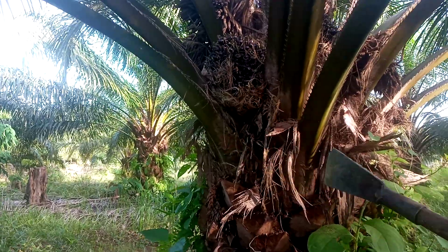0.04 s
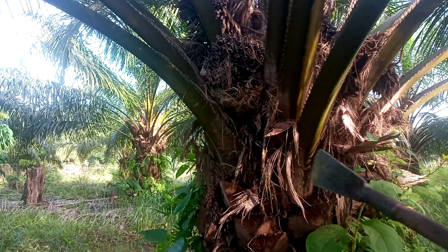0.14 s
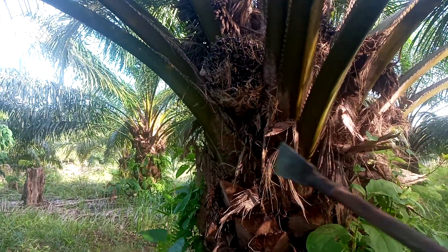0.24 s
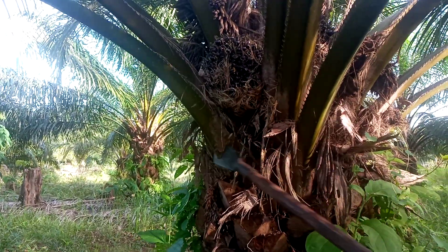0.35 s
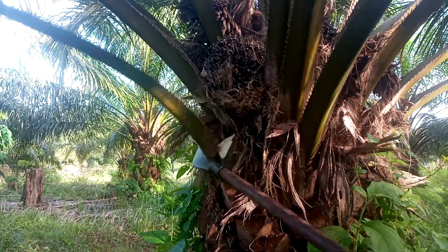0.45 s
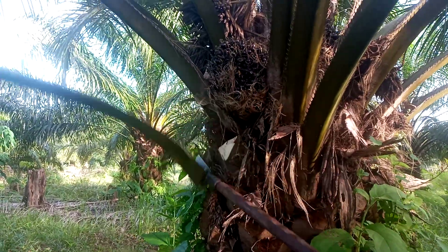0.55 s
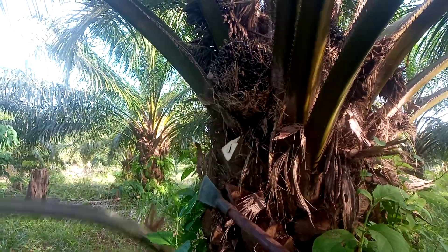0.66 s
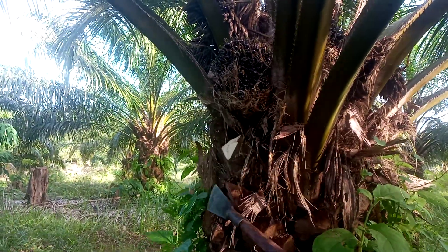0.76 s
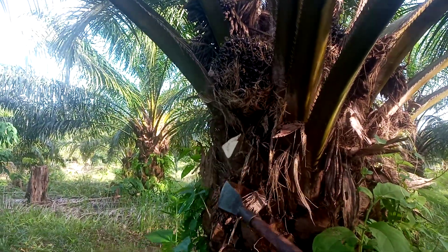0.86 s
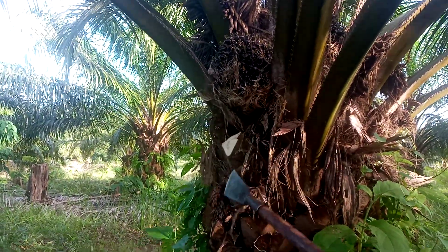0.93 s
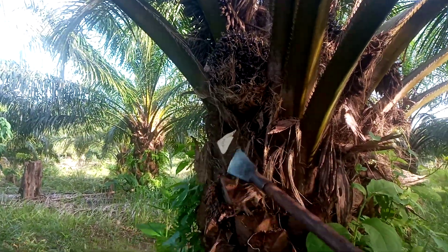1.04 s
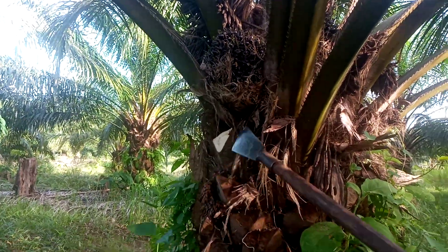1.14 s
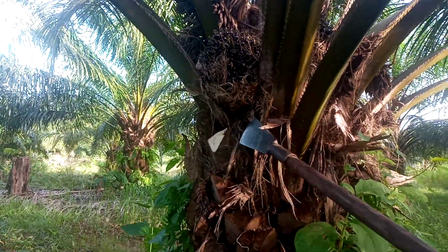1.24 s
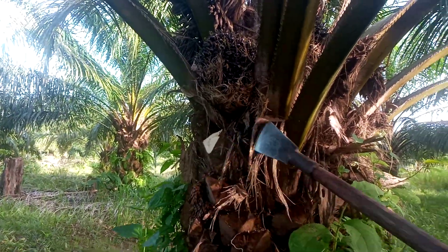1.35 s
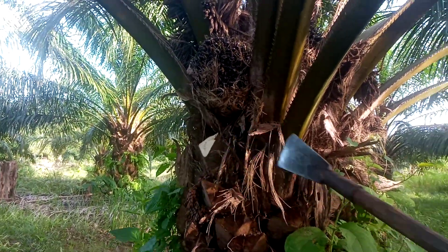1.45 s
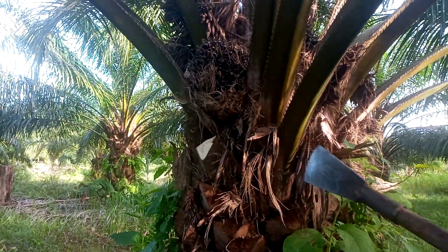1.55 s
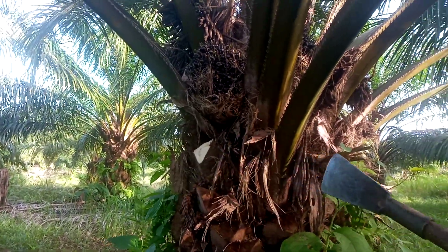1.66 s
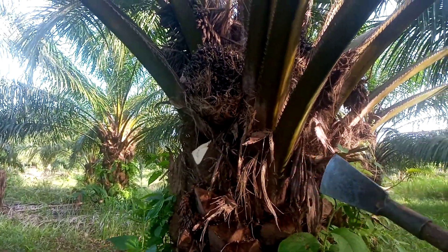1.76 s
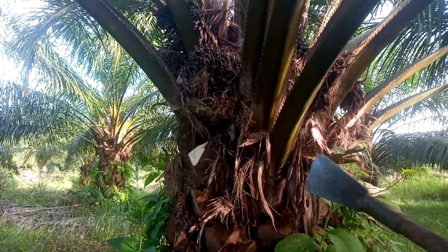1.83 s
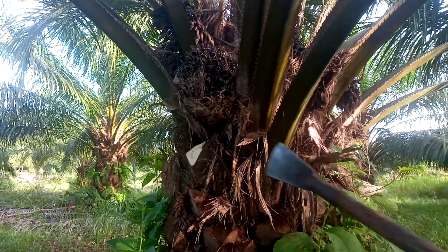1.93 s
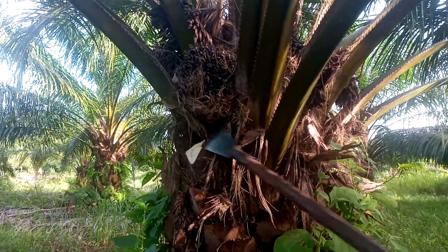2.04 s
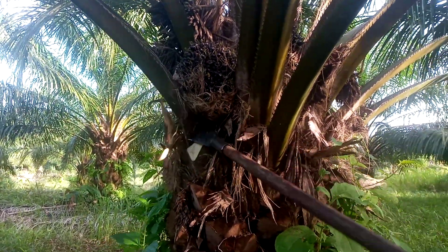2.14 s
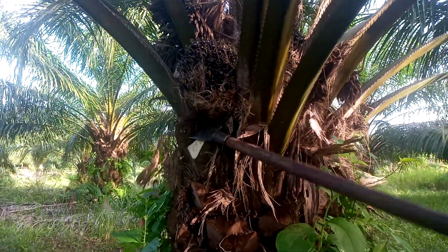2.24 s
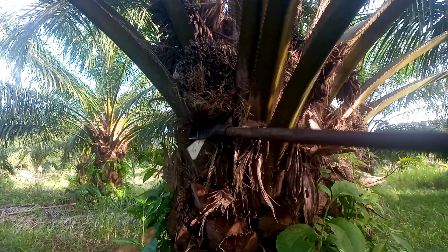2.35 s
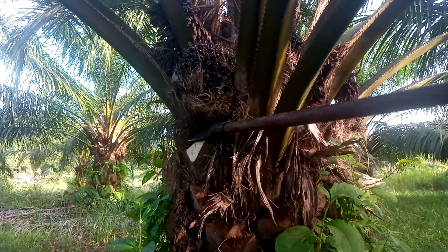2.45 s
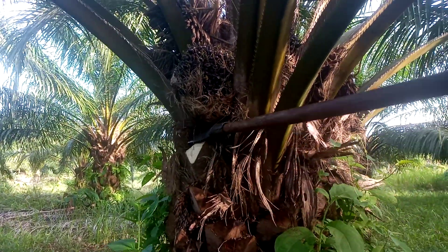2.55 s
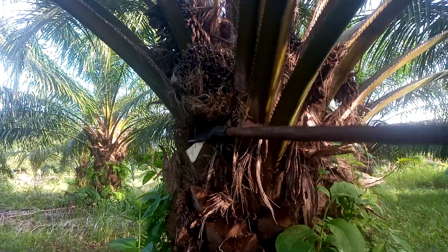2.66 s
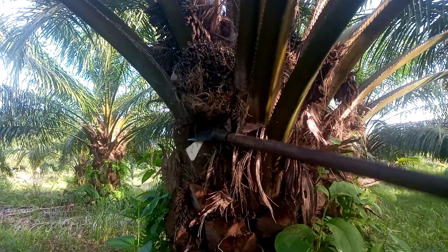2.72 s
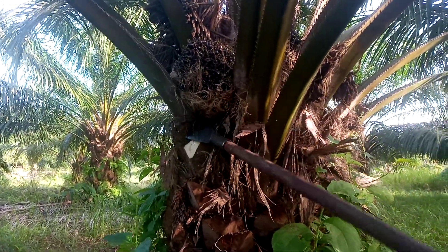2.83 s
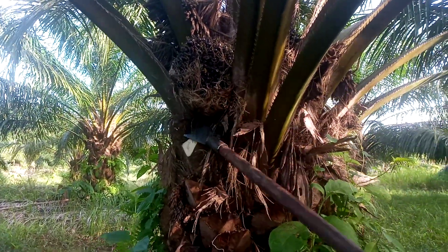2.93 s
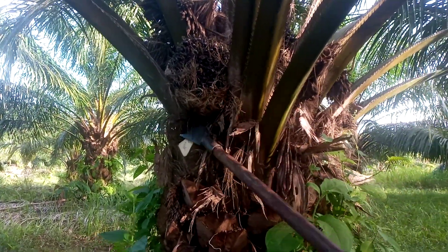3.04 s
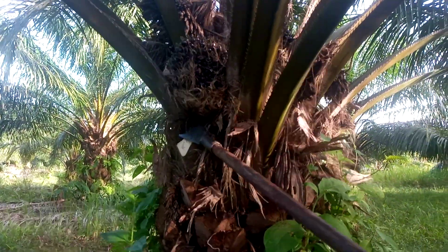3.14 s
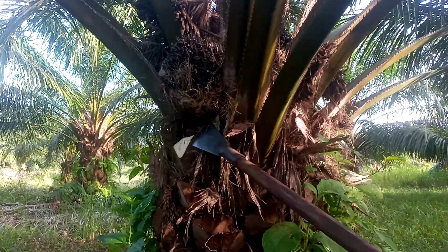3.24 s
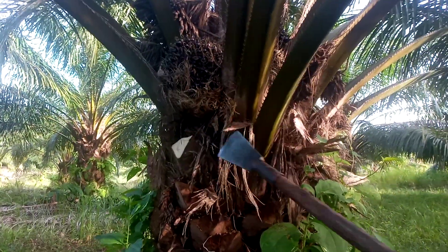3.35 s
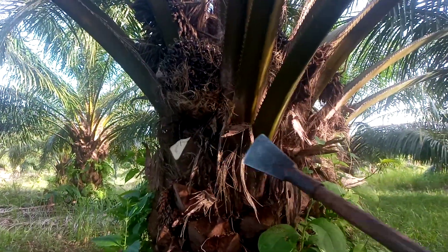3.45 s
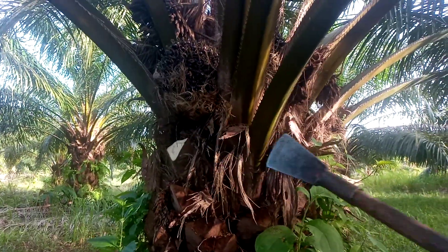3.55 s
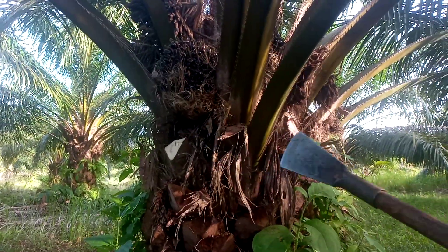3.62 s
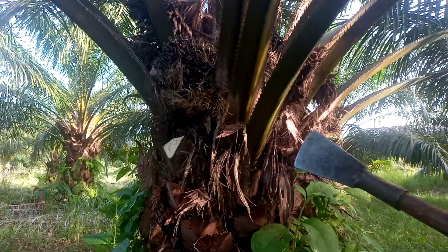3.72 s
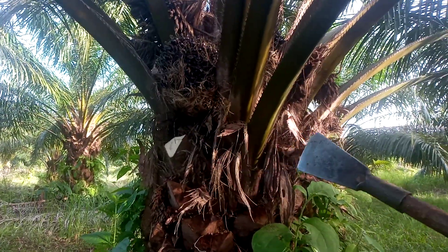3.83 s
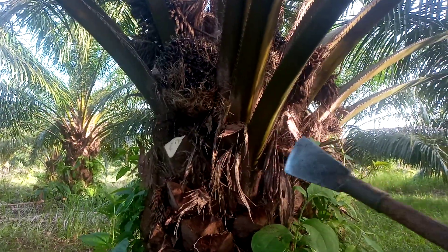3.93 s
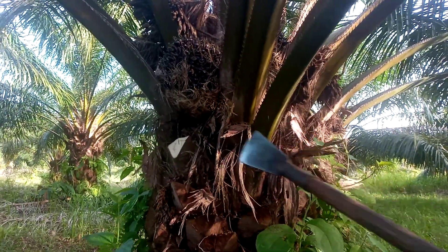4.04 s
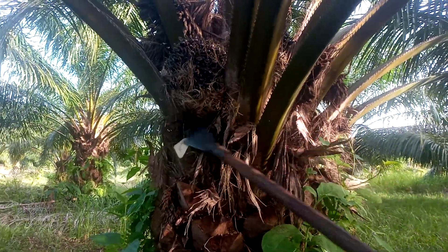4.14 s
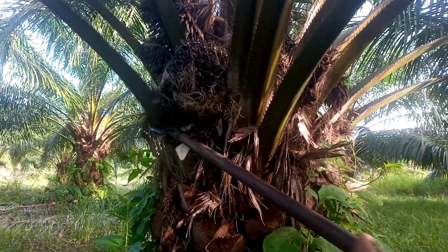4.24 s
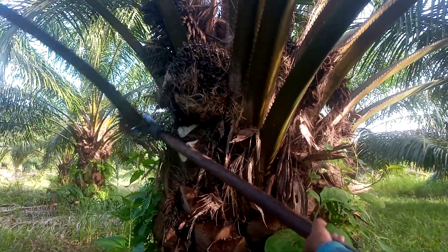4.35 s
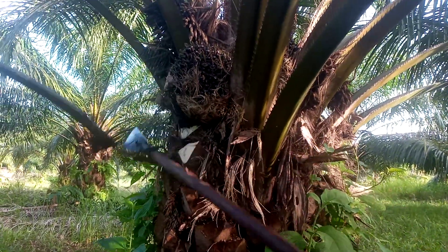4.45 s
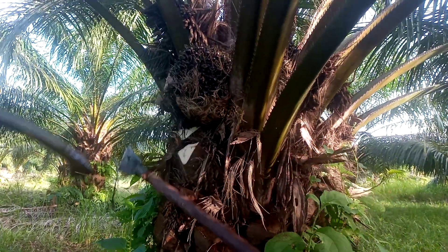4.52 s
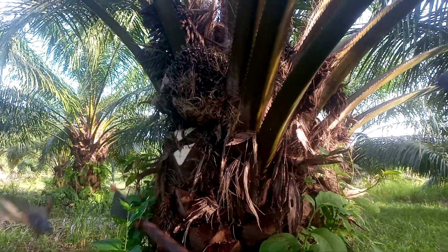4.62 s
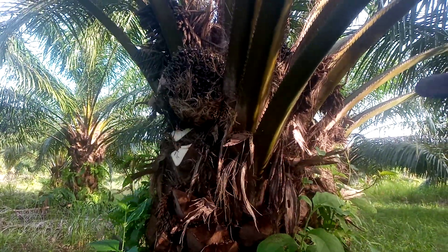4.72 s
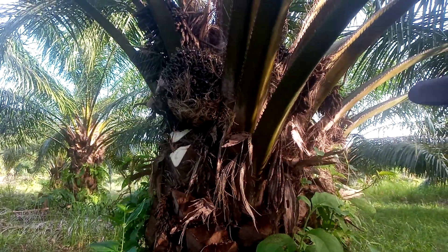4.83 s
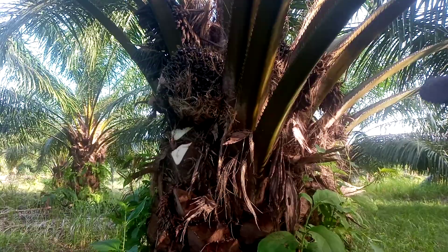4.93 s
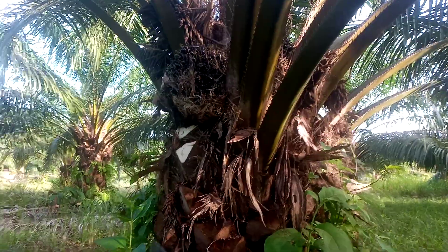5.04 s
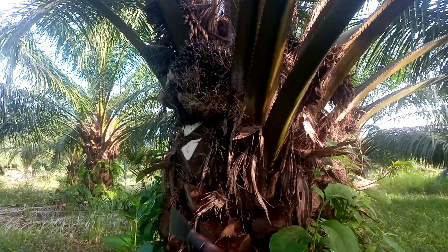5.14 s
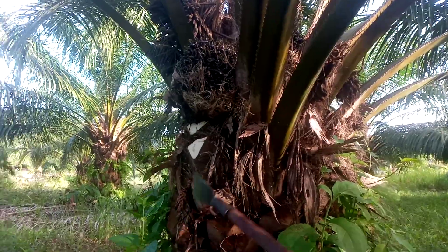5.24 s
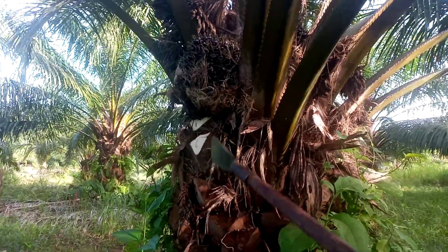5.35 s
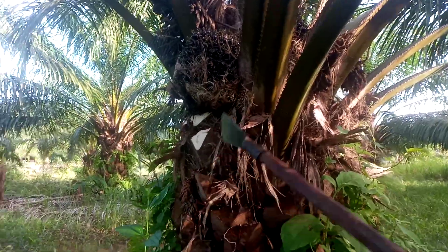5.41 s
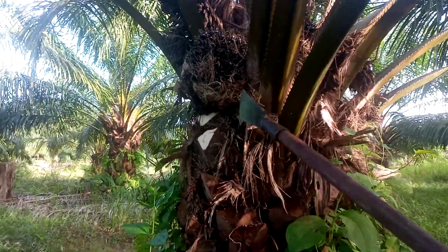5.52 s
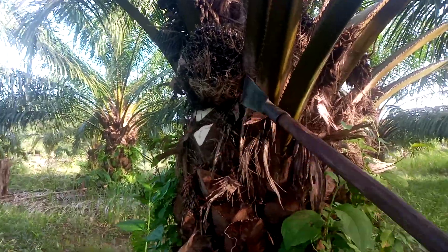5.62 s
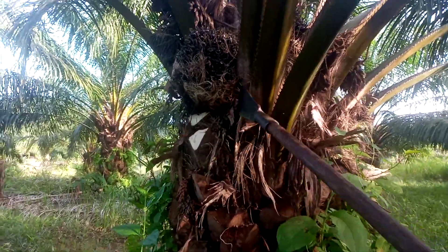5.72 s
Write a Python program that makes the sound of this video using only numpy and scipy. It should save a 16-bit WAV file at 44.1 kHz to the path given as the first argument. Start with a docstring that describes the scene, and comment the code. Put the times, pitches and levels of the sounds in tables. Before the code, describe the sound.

An open palm plantation with very quiet low air, a high insect chorus and a near cricket throbbing about fourteen times a second around 7.4 kHz, coming and going. At 0.33 s a steel blade ticks and crunches hard into a wet stalk; the frond slides down in a swelling dry rustle, thumps at 0.92 s, whips over with bright snaps and settles by 1.5 s. The pole brushes dry fibre softly. At 2.07 s a second chop cracks with a short metallic squeak and jams; from 2.2 to 2.5 s it creaks and jerks woodily. Faint rubs and crisp leaf snaps follow around 3 to 3.4 s. Knocks and a crunch at 4.2 s cut another frond, which rustles faster, lands with the heaviest thump at 4.86 s, bounces and settles. Light brushing and a leafy hiss end it near 5.7 s. Close phone sound, both channels identical, slight grove echo.

```python
"""Insects shrill all around, bands of noise with a throbbing cricket tone, and a pole brushes dry fibre.
A steel chisel on this long wooden pole chops fronds off an oil palm, a few metres from a phone.
Each stroke ticks and crunches, as bursts of tiny fractures shake the stalk and the blade.
Two cut fronds rustle down as surges of crackle and noise, and thump on the ground as sinking low tones.
The second stroke jams, and the blade creaks in runs of slips as it is levered free."""
import sys
import numpy as np
from scipy import signal
from scipy.fft import rfft, irfft
from scipy.io import wavfile
from scipy.ndimage import uniform_filter1d

SR = 44100
rng = np.random.default_rng(int(sys.argv[2]) if len(sys.argv) > 2 else 0)


def dump(signal):
    """Clip the signal to [-1, 1] and save it as 16-bit WAV at the path in sys.argv[1]."""
    limited = np.clip(np.atleast_2d(signal).T, -1, 1)
    pcm = np.round(limited * 32767).astype(np.int16)
    wavfile.write(sys.argv[1], SR, pcm)


N = 254898
T = np.arange(N) / SR  # time in seconds

# Tone colour of breaking fibres. Each row: frequency in Hz, relative level in dB.
CRUNCH_COLOUR = [(240, -50.5), (400, -3), (570, -12), (1460, -2.5), (2050, -8), (2400, -1), (3420, -1.5),
                 (3810, -5.5), (4510, -2.5), (5110, -8.5), (6850, -1), (13300, -20.5), (15000, -11.5),
                 (16000, -5.5)]
# Tones of the steel blade. Each row: frequency in Hz, relative level in dB, time to fall by 60 dB in seconds.
BLADE_TONES = [(1288, -21, 0.27), (1470, -5.5, 0.035), (1934, 0, 0.068), (2974, -12.5, 0.089),
               (3740, 2, 0.21), (4240, -18, 0.51), (5530, -17, 0.17), (6920, -29, .15)]


def amp(db):
    """Turn dB into a plain multiplier."""
    return 10 ** (np.asarray(db) / 20)


def unit(x):
    """Scale x to an average (RMS) level of 1."""
    return x / np.sqrt(np.mean(x ** 2))


def noise():
    """Steady random hiss as long as the scene."""
    return rng.standard_normal(N)


def decay(t, t60):
    """Fading gain that falls by 60 dB in t60 seconds."""
    return np.exp(-np.log(1000) * t / t60)


def add(out, s, x):
    """Mix x into out at time s."""
    i = int(s * SR)
    out[i:i + len(x)] += x[:N - i]


def band(x, hz, width):
    """Keep only a band of frequencies around hz."""
    low = np.hypot(hz, width / 2) - width / 2
    high = min(low + width, .45 * SR)
    return signal.sosfilt(signal.butter(2, [low, high], "band", fs=SR, output="sos"), x)


def treble(x, hz):
    """The part of x above hz, in phase with x."""
    return signal.sosfiltfilt(signal.butter(2, hz, "high", fs=SR, output="sos"), x)


def colour(x, points, size=2048):
    """Filter of unit energy with the given (Hz, dB) shape; it never sounds ahead of its input."""
    hz, db = np.transpose(points)
    bins_hz = np.arange(size // 2 + 1) * SR / size
    gain = amp(np.interp(np.log(bins_hz + 1), np.log(hz), db))
    # folding the cepstrum gives the filter its earliest possible response
    cepstrum = irfft(np.log(gain))
    cepstrum[1:size // 2] *= 2
    cepstrum[size // 2 + 1:] = 0
    h = irfft(np.exp(rfft(cepstrum)))
    return signal.fftconvolve(x, h / np.linalg.norm(h))[:len(x)]


def ring(x, modes):
    """Let x strike a set of damped tones; their dB are shares of a unit energy."""
    t = T[:SR // 2]
    h = np.zeros(len(t))
    for k, (hz, db, t60) in enumerate(modes):
        tone = np.sin(2 * np.pi * hz * t) * decay(t, t60)
        h += (-1) ** k * amp(db) / np.sqrt(t60) * tone
    return signal.fftconvolve(x, h / np.linalg.norm(h))[:N]


def walk(rate):
    """Smooth random wandering with a spread of 1, given a new target rate times a second."""
    k = int(SR / rate)
    steps = np.repeat(noise()[:N // k + 1], k)
    return unit(uniform_filter1d(steps, k)[:N])


def crackle(rate, spread_db):
    """Tiny fractures at random times, about rate a second, a few much larger than the rest."""
    sizes = amp(spread_db * np.minimum(rng.exponential(size=N), 5))
    return unit((rng.random(N) < rate / SR) * sizes * np.sign(noise()))


def burst(t60):
    """Noise that starts at once and dies away."""
    t = T[:SR // 5]
    return np.sign(rng.standard_normal(len(t))) * decay(t, t60)


def surge(s, rise, hold, fade):
    """Gain of one movement: it accelerates, holds and dies away."""
    return np.clip((T - s) / rise, 0, 1) ** 2 * np.exp(-np.maximum(T - s - rise - hold, 0) / fade)


def air():
    """Quiet, low background noise whose level wanders slowly."""
    # Each row: frequency in Hz, relative level in dB.
    air_colour = [(18, -88), (30, -13), (107, -7), (164, -9), (228, -19.5), (247, -30), (388, -25.5),
                  (560, -32), (1500, -58), (4000, -60), (5200, -68), (8800, -120)]
    return colour(noise(), air_colour) * amp(-69 + 1.9 * walk(6.8))


def insects():
    """A far chorus in fixed bands of noise and one near cricket, an unsteady tone that throbs evenly."""
    # Each row: centre in Hz, width of each filter pass in Hz, level in dB.
    chorus_bands = [(5010, 1650, -56.5), (6710, 890, -50), (7456, 710, -47), (15400, 1500, -63)]
    # Stretches where the cricket tone is loud enough to hear.
    # Each row: start in seconds, length in seconds, level in dB.
    audible_spans = [(-.05, 1.3, -39.5), (1.396, 1.06, -41.5), (2.756, 0.88, -43), (3.725, 0.53, -38),
                     (4.85, 1.14, -41.5)]
    span_edge_s, throbs_per_s, throb_depth = 0.15, 13.57, 1
    chorus = np.zeros(N)
    for hz, width, db in chorus_bands:
        hum = unit(band(band(noise(), hz, width), hz, width))
        chorus += hum * amp(db + 0.33 * walk(3.34) + 1.6 * walk(40))
    throb = (.5 + .5 * np.cos(2 * np.pi * throbs_per_s * (T - .235))) ** 1.2
    pitch_hz = 7438 + 18 * walk(90) + 50 * walk(900)
    wing = np.sqrt(2) * np.sin(2 * np.pi * np.cumsum(pitch_hz) / SR) * amp(2.5 * walk(270))
    audible_gain = np.zeros(N)
    for s, length, db in audible_spans:
        to_edge = np.minimum(T - s, s + length - T)
        audible_gain += amp(db) * np.clip(to_edge / span_edge_s + .5, 0, 1)
    return chorus + wing * (1 - throb_depth * (1 - throb)) * audible_gain


def brushing():
    """Dry fibre crackles softly against the moving pole and chafes in brief patches of changing pitch."""
    # Moves of the pole. Each row: start, rise, hold and fade in seconds, relative level in dB.
    moves = [(0.073, 0.13, 0.047, 0.051, -58.5), (1.484, 0.07, 0.19, 0.12, -57.5),
             (1.864, .13, 0.025, 0.053, -47.5), (2.07, 0.044, 0.38, 0.22, -44),
             (2.824, 0.24, 0.075, 0.18, -53), (3.9, 0.31, .01, .03, -46.5), (5.3, 0.19, .3, 0.055, -54.5)]
    # Tone colour of dry fibre. Each row: frequency in Hz, relative level in dB.
    fibre_colour = [(180, -31), (300, -11), (511, -24.5), (645, -15.5), (946, -28), (1780, -10),
                    (4990, -6.5), (7320, -7), (8940, -9), (16000, -20)]
    holding_db = -66  # faint chafing while the pole is held back
    chafe_db, chafe_flutter_db = -10, 3
    surges = [amp(db) * surge(*shape) for *shape, db in moves]
    gain = amp(holding_db) + np.linalg.norm(surges, axis=0)
    grains = crackle(6000, 2.4)
    chafe = np.zeros(N)
    for hz in np.geomspace(1100, 2800, 4):
        chafe += band(crackle(1500, 2.5), hz, .35 * hz) * amp(chafe_flutter_db * walk(30))
    crackling = colour(grains * gain * amp(4.6 * walk(35)), fibre_colour)
    return amp(2.5) * crackling + amp(chafe_db) * gain * unit(chafe)


def rubs():
    """Pole and loose stalks rub briefly on old frond stubs: faint grainy noise, each rub with its own pitch."""
    # Each row: start in seconds, length in seconds, centre in Hz, level in dB.
    rub_times = [(.209, 0.034, 1010, -56.5), (0.273, 0.052, 1650, -57), (0.901, .026, 293, -46.5),
                 (2.028, 0.035, 1790, -50), (3.021, 0.041, 2530, -49.5), (3.186, 0.033, 2640, -48),
                 (3.193, 0.042, 1480, -47.5), (3.392, 0.017, 3020, -46), (3.509, .018, 2030, -54.5),
                 (3.946, 0.024, 2720, -57.5), (4.119, .026, 1480, -48.5), (4.145, .03, 1900, -48),
                 (4.297, 0.062, 261, -48.5)]
    out, grains = np.zeros(N), crackle(1500, 1.2)
    for s, length, hz, db in rub_times:
        n = int(length * SR)
        chafe = band(grains[int(s * SR):][:n], hz, 0.45 * hz)
        add(out, s, amp(db) * unit(chafe) * signal.windows.tukey(n))
    return out


def cracks(rows, ring_db):
    """Sharp cracks with a short splintering tail; they set the blade ringing."""
    bodies, splinters, steel = np.zeros((3, N))
    for s, db, hz, t60 in rows:
        crack = amp(db) * (burst(t60) + 0.13 * burst(0.092))
        width = min(0.67 * hz, 3800)
        add(bodies, s, band(crack, hz, width) * np.sqrt(SR / width))
        add(splinters, s, crack)
        steel[int(s * SR)] = amp(db + ring_db)
    splintering = 0.41 * colour(treble(splinters, 560), CRUNCH_COLOUR) + 0.4 * treble(splinters, 15000)
    return 0.58 * bodies + splintering + amp(34.0) * ring(steel, BLADE_TONES)


def snaps():
    """The loudest dry fibres snap, each a bright, short crack."""
    # Each row: start in seconds, relative level in dB, centre in Hz, main part's time to fall by 60 dB in seconds.
    snap_times = [(.332, -33, 11500, 0.026), (.971, -25.5, 6330, 0.015), (1.062, -17.5, 4400, 0.0068),
                  (1.069, -14, 4600, 0.0051), (1.078, -15, 5330, .003), (1.127, -18, 6150, 0.0074),
                  (1.207, -19, 6150, 0.0099), (1.370, -23, 6130, 0.0077), (1.612, -26, 6040, 0.015),
                  (2.071, -21, 5500, 0.006), (3.236, -18, 7500, 0.0089), (3.253, -20, 7060, .012),
                  (3.282, -21, 7260, 0.018), (3.330, -19, 7400, 0.017), (3.343, -17.5, 6840, 0.0088),
                  (4.958, -20.5, 6350, 0.016), (5.197, -19, 10200, 0.0092)]
    return cracks(snap_times, ring_db=-33)


def knocks():
    """The blade or a falling stalk knocks against wood, mostly a lower crack than a snap."""
    # Each row: start in seconds, relative level in dB, centre in Hz, main part's time to fall by 60 dB in seconds.
    knock_times = [(.333, -25.5, 3130, 0.018), (.412, -24.5, 2400, 0.042), (.923, -22, 1240, 0.007),
                   (1.548, -29.5, 1300, 0.0081), (2.0705, -18, 2160, .005), (2.076, -36, 2030, 0.015),
                   (2.755, -20.5, 3750, .022), (2.767, -28.5, 3700, 0.018), (3.128, -37, 2580, 0.02),
                   (3.331, -38, 1150, 0.014), (4.015, -40.5, 580, 0.023), (4.077, -33, 2230, 0.02),
                   (4.183, -22, 2020, 0.015), (4.226, -22.5, 1320, 0.034)]
    return cracks(knock_times, ring_db=-31)


def squeaks():
    """Short gliding, unsteady tones: the steel blade sings, and one faint low creak."""
    # Each row: start in seconds, length in seconds, mean pitch at start and at end in Hz, mean level in dB.
    squeak_times = [(.333, .028, 3600, 3570, -44), (2.088, .019, 4150, 4650, -24),
                    (2.812, .085, 960, 1100, -57), (4.200, .014, 4050, 4300, -34),
                    (4.425, .025, 1940, 1960, -42)]
    out = np.zeros(N)
    waver, unsteady_gain = 1 + 0.034 * walk(920), amp(2.6 * walk(200))
    for s, length, start_hz, end_hz, db in squeak_times:
        i, n = int(s * SR), int(length * SR)
        hz = np.linspace(start_hz, end_hz, n) * waver[i:i + n]
        add(out, s, amp(db) * signal.windows.tukey(n) * np.sin(2 * np.pi * np.cumsum(hz) / SR))
    return out * unsteady_gain


def rustle():
    """Stiff leaflets sweep past each other, flick and scrape, and now and then one snaps."""
    # In order: the first frond slides down, lands, whips over and settles; the blade draws back through dry leaf;
    # the second frond slides down, gathers speed, lands, bounces, lies down and settles;
    # the blade goes back in among dry leaf.
    # Each row: start, rise, hold and fade in seconds, relative level in dB, extra treble in dB.
    sweeps = [(0.355, 0.16, 0.1, 0.42, -34.5, -3), (0.869, 0.12, 0.042, 0.072, -32, -5),
              (1.075, 0.052, 0.0071, 0.011, -37, 5), (1.138, 0.03, 0.17, 0.14, -37, -4),
              (3.215, .04, 0.12, 0.049, -58.5, 14), (4.228, 0.058, 0.36, 0.24, -36, -6),
              (4.689, .11, 0.044, 0.035, -36, 1), (4.828, 0.053, 0.011, 0.044, -28.5, -6.5),
              (4.924, 0.048, 0.011, 0.09, -31, -3), (4.994, 0.058, 0.1, 0.019, -33, -5.5),
              (5.182, .07, 0.036, 0.17, -38, -6), (5.704, 0.067, .05, .05, -50.5, 11.5)]
    # Tone colour of leaves. Each row: frequency in Hz, relative level in dB.
    leaf_colour = [(59, -26.5), (100, -18), (174, -14.5), (249, -17.5), (308, -14.5), (818, -19),
                   (1650, -9.5), (2580, -8.5), (3620, -4), (5190, -8.5), (7290, -1), (9210, -12),
                   (12900, -21), (15000, -9.5), (16000, -22)]
    snaps_per_s, snap_db, snap_hz, snap_spread_db = 96, -15, 5800, 4.5
    # overlapping surges add in power
    body = np.linalg.norm([amp(db) * surge(*shape) for *shape, db, _ in sweeps], axis=0)
    top = np.linalg.norm([amp(db + treble_db) * surge(*shape) for *shape, db, treble_db in sweeps], axis=0)
    flicks = crackle(7000, 2.2) + .8 * noise()
    # leaflets of different sizes take turns, so each band flutters on its own
    flutter = np.zeros(N)
    for hz in np.geomspace(1200, 10000, 6):
        flutter += band(crackle(1500, 2.2), hz, hz / 2) * amp(4 * walk(80))
    leaves = colour(unit(flicks + 0.26 * flutter) * amp(1.4 * walk(70)), leaf_colour)
    hiss = treble(leaves, 5800)
    snapping = signal.fftconvolve(crackle(snaps_per_s, snap_spread_db), burst(0.0046))[:N]
    snapping = unit(band(snapping, snap_hz, 3900))
    return amp(3.5) * body * (leaves - hiss) + amp(9.0) * top * hiss + amp(snap_db) * body * snapping


def chops():
    """Fibres break in a dense volley as the edge goes through; they shake the stalk and the blade."""
    # Volleys of breaking fibre, the first two from one stroke.
    # Each row: start, rise, hold and fade in seconds, stalk pitch in Hz,
    # then relative levels in dB of the crunch, the stalk's thud and the blade's ring.
    volleys = [(0.371, 0.0069, 0.0023, 0.0079, 361, -14, -24.5, -32),
               (0.393, 0.0051, 0.012, 0.025, 325, -27, -43, -31.5),
               (2.087, 0.0015, 0.025, .009, 244, -19.5, -34.5, -40.5),
               (4.196, 0.027, 0.018, 0.011, 215, -19.5, -28.5, -71)]
    # Thick wet stalk. Each row: multiple of its pitch, relative level in dB, time to fall by 60 dB in seconds.
    stalk_tones = [(.55, -6, 0.031), (1, 1, 0.029), (1.6, -11.5, 0.032)]
    crunch, steel, thud = np.zeros((3, N))
    fibres = crackle(9000, 6.2) * amp(0.32 * walk(350))
    for s, rise, hold, fade, hz, crunch_db, thud_db, ring_db in volleys:
        push = np.clip((T - s) / rise, 0, 1) * np.exp(-np.maximum(T - s - rise - hold, 0) / fade)
        force = fibres * push
        crunch += amp(crunch_db) * force
        steel += amp(ring_db) * force
        thud += amp(thud_db) * ring(force, [(hz * k, db, t60) for k, db, t60 in stalk_tones])
    return colour(crunch, CRUNCH_COLOUR) + thud + ring(steel, BLADE_TONES)


def thumps():
    """Low thumps, from heavy blows to faint dull rumbles: a damped swing sinks in pitch, with a dull crush."""
    # Each row: start in seconds, relative level in dB, base pitch in Hz (the swing sinks from 1.133 to
    # 0.633 times this), time to fall by 60 dB in seconds.
    thump_times = [(0.921, -22.5, 167, 0.046), (2.123, -30, 230, 0.077), (2.150, -37, 120.5, 0.11),
                   (2.484, -36, 284, 0.19), (4.25, -44, 142, 0.29), (4.858, -10.5, 139, 0.081),
                   (4.953, -30.5, 126, 0.065)]
    out, t = np.zeros(N), T[:SR // 5]
    for s, db, hz, t60 in thump_times:
        sinking_hz = hz * (0.633 + .5 * np.exp(-t / 0.0082))
        soft_start = 1 - np.exp(-t / 0.0034)
        swing = np.sin(2 * np.pi * np.cumsum(sinking_hz) / SR) * decay(t, t60) * soft_start
        crush = band(burst(t60), 146, 295)
        add(out, s, amp(db) * (0.89 * swing + 1.17 * crush))
    return out


def levering():
    """The jammed blade sticks and slips, in nearly even runs and single jerks that knock stalk and pole."""
    # Hard jerks as it starts to move and as it comes free. Each row: start in seconds, relative level in dB.
    single_slips = [(2.249, -15.5), (2.425, -14), (2.45, -12), (2.467, -21), (2.479, -11), (2.498, -12.5)]
    # Creaks. Each row: start in seconds, length in seconds, slips per second, relative level in dB.
    creaks = [(2.191, .033, 290, -20), (2.256, .036, 272, -23), (2.2944, .048, 90, -20.5),
              (2.333, .029, 150, -19.5), (2.365, .058, 94, -16.5)]
    # Tone colour of the wood. Each row: frequency in Hz, relative level in dB.
    wood_colour = [(88, -33), (150, -8), (259, -9.5), (566, -15), (1060, 3.5), (1630, -16.5), (1870, -1),
                   (2060, -10), (2450, -6), (4490, -8.5), (7180, -11.5), (8900, -22.5), (16000, -28)]
    # Levered stalk and pole. Each row: frequency in Hz, relative level in dB, time to fall by 60 dB in seconds.
    pole_tones = [(254, -3, 0.23), (370, -12, 0.021), (755, -4, 0.061), (798, -2, 0.053), (920, -4, 0.059),
                  (1035, 4, 0.12), (1340, -6.5, 0.022), (1416, 1.5, 0.072), (1870, -6.5, 0.037),
                  (2325, -2.5, .06), (2940, -7.5, 0.049), (4340, -14.5, 0.026)]
    jitter_s, scatter_db = .0001, 0.9
    # slips are brightest where the grip is tightest and duller before and after
    tightest_s, tight_treble_db, dulling_db_per_s = 2.3, 6.5, 60
    slips = list(single_slips)
    for s, length, rate, db in creaks:
        for k in range(int(length * rate)):
            slip_s = s + k / rate + jitter_s * rng.standard_normal()
            slips.append((slip_s, db + scatter_db * rng.standard_normal()))
    force, n = np.zeros(N), int(.0013 * SR)
    tearing = crackle(3000, 1.6)  # small fibres part after each jerk
    for s, db in slips:
        creep = 0.12 * np.linspace(0, 1, n) * rng.standard_normal(n)  # fibres start to give
        tail = burst(0.067) * tearing[int(s * SR):][:SR // 5]
        jerk = np.concatenate([creep, 0.65 * burst(0.015) + 0.23 * tail])
        jerk[n] += 2.4  # the sudden release
        bright_db = tight_treble_db - dulling_db_per_s * abs(s - tightest_s)
        add(force, s, amp(db) * (jerk + (amp(bright_db) - 1) * treble(jerk, 2700)))
    return amp(-1.0) * colour(force, wood_colour) + amp(-8) * ring(force, pole_tones)


def grove(x, echo_db=-20):
    """Trunks and crowns scatter a thin, short echo."""
    t, t60 = T[:SR // 2], .55
    h = crackle(3000, 1.7)[:len(t)] * decay(t, t60) * (t > .006)
    return x + amp(echo_db) * signal.fftconvolve(x, h / np.linalg.norm(h))[:N]


def scene():
    """All the work and the plantation around it, the same in both channels."""
    work = grove(rubs() + snaps() + knocks() + squeaks() + chops() + thumps() + levering())
    return np.tile(air() + insects() + brushing() + work + rustle(), (2, 1))


def record(dry):
    """The phone drops the deep bass, rounds the highest peaks and cuts the top."""
    bass_cut_hz, top_hz = 62, 15950
    thin = signal.sosfilt(signal.butter(3, bass_cut_hz, "high", fs=SR, output="sos"), dry)
    rounded = np.tanh(1.806 * thin) / 1.815
    return signal.sosfilt(signal.ellip(10, .2, 70, top_hz, fs=SR, output="sos"), rounded)


dry = scene()
out = record(dry)
dump(out)
```